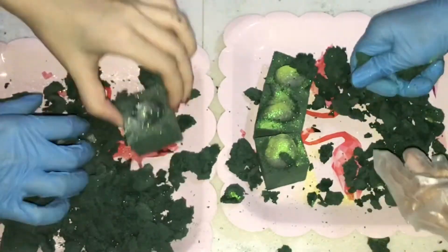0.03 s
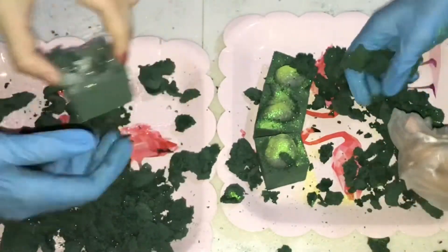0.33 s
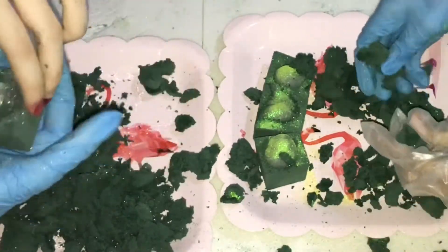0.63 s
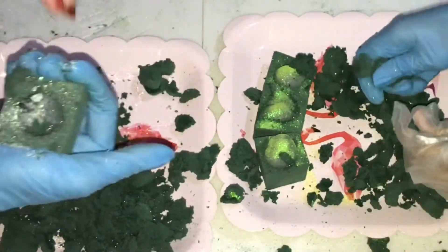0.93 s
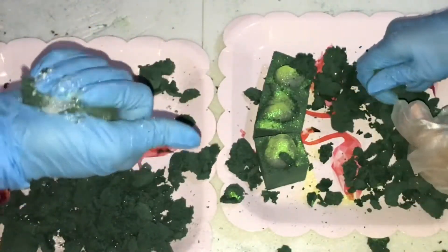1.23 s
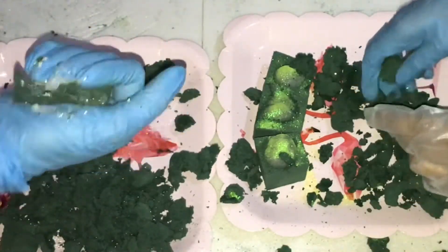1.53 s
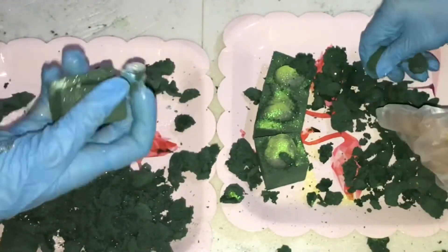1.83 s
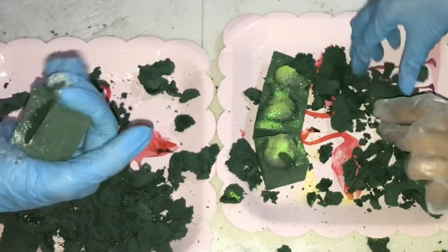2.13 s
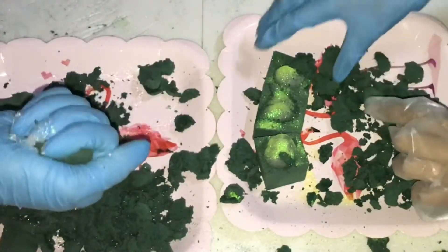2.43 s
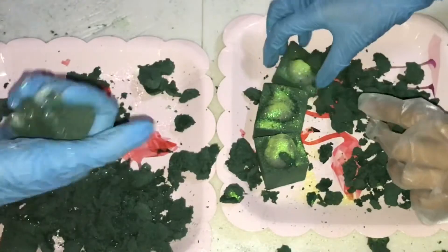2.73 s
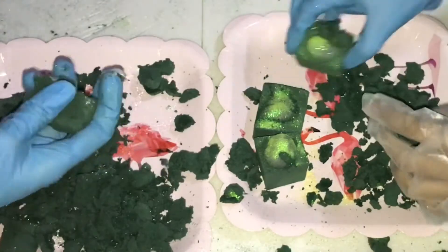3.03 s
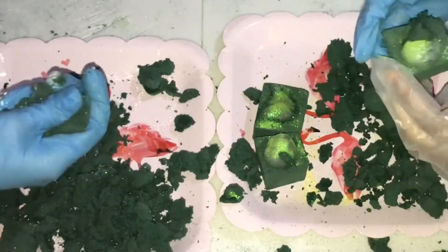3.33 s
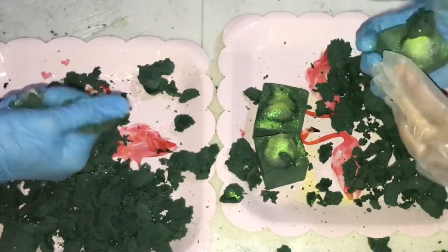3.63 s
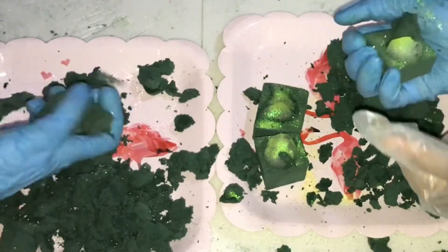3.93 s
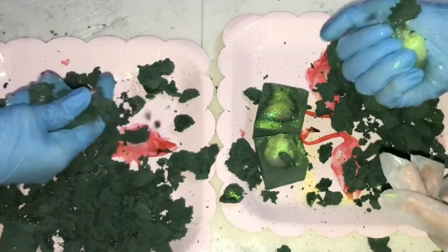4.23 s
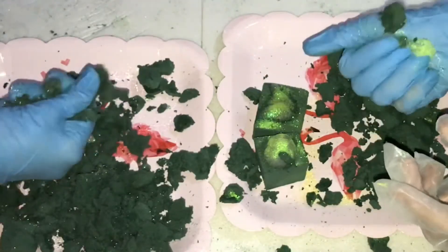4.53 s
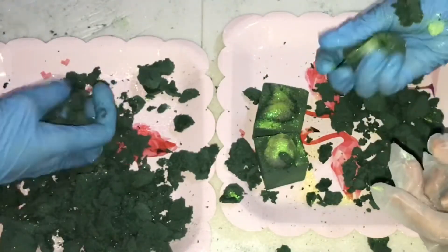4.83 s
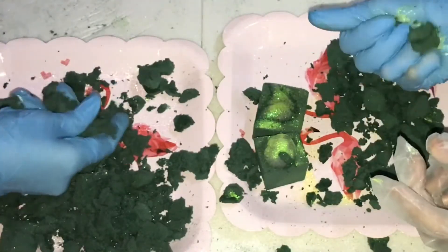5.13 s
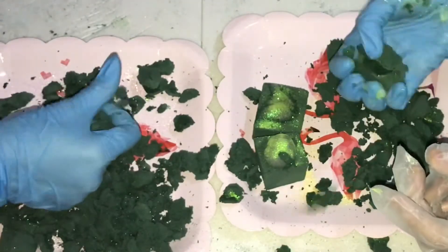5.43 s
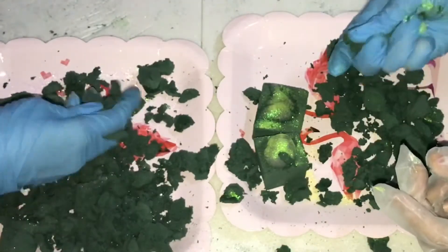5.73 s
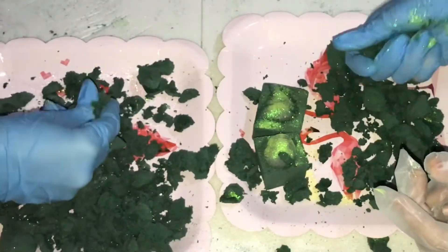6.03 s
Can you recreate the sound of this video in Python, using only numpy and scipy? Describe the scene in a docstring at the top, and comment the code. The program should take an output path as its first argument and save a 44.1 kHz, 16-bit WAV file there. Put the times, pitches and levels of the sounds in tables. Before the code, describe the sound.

Dry foam crunches and crackles in irregular squeezes, with occasional crisp snaps and faint glove rubbing in a quietly humming room.

```python
"""A dry, gritty crunching: gloved hands crush blocks of floral foam over plastic trays in a small room.
By brittle fracture, countless cell walls give way in a fine hiss and whole clusters in a coarser crunch
that rings the hollow of hand and tray; now and then a piece breaks with a sharp snap.
Gloves rub and lumps tap the tray, close to a mono microphone. The room rumbles and hums faintly."""
import sys
import numpy as np
from scipy import signal
from scipy.fft import rfft, irfft
from scipy.io import wavfile

SR = 44100
rng = np.random.default_rng(int(sys.argv[2]) if len(sys.argv) > 2 else 0)


def generate_wav(sig):
    """Save sig (samples, or channels by samples) to the path in sys.argv[1] as 16-bit PCM at SR."""
    pcm = np.round(np.clip(np.atleast_2d(sig).T, -1, 1) * 32767).astype(np.int16)
    wavfile.write(sys.argv[1], SR, pcm)


N = 277830
TIME = np.arange(N) / SR


def from_db(db):
    """Amplitude ratio of a level in decibels."""
    return 10 ** (np.asarray(db) / 20)


def unit_rms(x):
    """Normalisation to a mean power of 1."""
    return x / np.sqrt(np.mean(x ** 2) + 1e-20)


def drift(per_s):
    """Random modulation of rms 1: linear interpolation between per_s Gaussian values a second."""
    return unit_rms(np.interp(TIME * per_s, np.arange(N), rng.standard_normal(N)))


def band(x, low_hz, high_hz, order=2):
    """Causal Butterworth band-pass."""
    edges = [low_hz, min(high_hz, .45 * SR)]
    return signal.sosfilt(signal.butter(order, edges, "band", fs=SR, output="sos"), x + 1e-18)


def colour(x, spectrum, size=8192):
    """Minimum-phase filter through (f/Hz, gain/dB) points, so nothing sounds early."""
    hz, db = np.transpose(spectrum)
    grid_hz = np.maximum(np.arange(size // 2 + 1) * SR / size, 1)
    gain = from_db(np.interp(np.log(grid_hz), np.log(hz), db))
    cepstrum = irfft(np.log(gain))
    cepstrum[1:size // 2] *= 2
    cepstrum[size // 2 + 1:] = 0
    response = irfft(np.exp(rfft(cepstrum)))
    return signal.fftconvolve(x, response)[:N]


def resonance(x, hz, width_hz):
    """Damped two-pole resonator with gain 1 at its peak."""
    r = np.exp(-np.pi * width_hz / SR)
    gain = (1 - r * r) / 2
    feedback = [1, -2 * r * np.cos(2 * np.pi * hz / SR), r * r]
    return signal.lfilter([gain, 0, -gain], feedback, x + 1e-18)


def impulses(per_s, spread_db):
    """Shot noise of mean power near 1; impulse levels follow an exponential distribution."""
    chance = np.clip(per_s / SR, 1e-4, 1)
    sizes = from_db(spread_db * np.minimum(rng.exponential(1, N), 4.5)) * rng.choice([-1, 1], N)
    return (rng.random(N) < chance) * unit_rms(sizes) / np.sqrt(chance)


def fade(start, end, rise_s, fall_s):
    """Exponential growth and decay, given as time constants, around a plateau of 1."""
    exponent = np.maximum(start - TIME, 0) / rise_s + np.maximum(TIME - end, 0) / fall_s
    return np.exp(-np.minimum(exponent, 20))


def swell(t, length):
    """Gaussian envelope centred on t; length spans two standard deviations."""
    return np.exp(-2 * np.minimum(((TIME - t) / length) ** 2, 20))


# spectrum of breaking foam: f/Hz, gain/dB
FOAM_SPECTRUM = [(500, 4.5), (1150, -8), (1450, -4.5), (2900, -3.5), (3800, 3), (5000, 2), (6100, 3),
                 (7800, -1.5), (9300, -2), (10400, -2.5), (11700, -1.5), (13500, -4), (16000, -6.5)]

def fractures(per_s, spread_db):
    """Brittle fracture: each failing wall radiates one tick with the spectrum of the foam."""
    return colour(impulses(per_s, spread_db), FOAM_SPECTRUM)


# modes of the hollow: f/Hz, bandwidth/Hz, gain/dB
HOLLOW_MODES = [(875, 78, -8), (1535, 120, -2.5), (2180, 270, -2.5)]
# ringing as the fist closes and opens: t/s, gain/dB
CUPPING = [(0, -15.5), (1, 6), (2.2, -27), (3.7, -2.5), (4.0, 3), (5.2, 2), (6.3, -2.5)]

def hollow(x):
    """Cavity resonance of cupped hand and tray, stronger as the hand closes."""
    ringing_db = np.interp(TIME, *np.transpose(CUPPING))
    modes = sum(from_db(db) * resonance(x, hz, width) for hz, width, db in HOLLOW_MODES)
    return from_db(ringing_db) * modes


# crumbs in the gloves: t/s, level/dB
HANDLING = [(0, -52), (.3, -59), (.5, -54.5), (1.65, -56), (2.45, -56), (2.83, -63), (2.92, -55),
            (3.45, -56.5), (3.83, -56.5), (4.65, -53.5), (5.2, -54.5), (6.3, -53)]

def handling():
    """Granular noise: loose crumbs shift all the while. Yields envelope, crumbs/dB, dust/dB."""
    yield from_db(np.interp(TIME, *np.transpose(HANDLING))), -4, -2


# crunches: peak t/s, level/dB, rise/s, decay/s, relative crumb level/dB
CRUNCHES = [(.02, -49, 0.1, 0.032, -11), (0.116, -45, 0.029, 0.043, -3.5), (.235, -50.5, 0.06, 0.036, -3.5),
            (.395, -46.5, 0.056, 0.078, -1.5), (.765, -47, 0.017, 0.024, -8), (.86, -50, .02, .025, -17),
            (0.945, -35, 0.039, 0.079, -4.5), (0.988, -34.5, 0.015, .013, -8),
            (1.45, -48.5, .015, 0.034, -2), (1.61, -47.5, 0.01, 0.004, -4), (1.68, -49, 0.011, 0.021, -3),
            (1.796, -38, 0.032, .015, -3.5), (2.171, -34.5, 0.0031, 0.0079, -2),
            (2.66, -47.5, 0.0063, 0.004, 3), (2.859, -49, .004, 0.013, -3.5),
            (3.082, -39, 0.044, 0.012, -1.5), (3.135, -49.5, 0.035, .09, 4.5),
            (3.58, -52, 0.018, 0.019, -14), (4.078, -34, 0.024, .022, -3.5), (4.3, -46, 0.078, 0.023, -5),
            (4.955, -47, 0.013, .03, -5.5), (5.118, -46, 0.0071, 0.052, -3), (5.275, -48, 0.06, 0.013, -1),
            (5.442, -45, .012, 0.012, -8), (5.564, -40.5, 0.0093, .045, -0.5), (5.643, -42, 0.017, .02, -3),
            (5.67, -39, .012, 0.015, -3.5), (5.886, -44, .01, 0.014, -2), (6.0, -51, 0.023, 0.009, 3.5),
            (6.285, -49, 0.014, .03, -0.5)]

def crunches():
    """Local yielding: a patch gives way under a finger. Yields envelope, crumbs/dB, dust/dB."""
    for t, db, rise_s, fall_s, crumbs_db in CRUNCHES:
        dust_db = 0.16 * (db + 39)  # harder crunches grind more dust
        yield from_db(db) * fade(t, t, rise_s, fall_s), crumbs_db, dust_db


def crushing_levels():
    """Incoherent sources add in power: levels in dB of crumbs, cells and dust over all hand movements."""
    power = np.zeros((3, N))
    for envelope, crumbs_db, dust_db in [*handling(), *crunches(), *squeezes()]:
        power += np.outer(from_db([crumbs_db, 0, dust_db]), envelope) ** 2
    return 10 * np.log10(power)


def crushing():
    """Fracture at three scales: the smaller the piece, the higher and denser its ticks."""
    crumbs_db, cells_db, dust_db = crushing_levels()
    # harder squeezing breaks more walls a second
    pace = from_db(0.17 * (cells_db - np.mean(cells_db)))
    # the foam yields in small avalanches that all sizes share
    surge_db = .8 * drift(25) + .5 * drift(90) + .9 * drift(500)
    clusters = fractures(2400 * pace, spread_db=-1.0)
    crumbs = band(clusters, 1035, 3350, order=5) + hollow(clusters)
    cells = band(fractures(5000 * pace, spread_db=-0.5), 2500, 7580, order=3)
    dust = band(fractures(13000 * pace, spread_db=0.5), 7800, 17900, order=3)
    return (unit_rms(crumbs) * from_db(crumbs_db + surge_db + 1.5 * drift(45) - 1.0)
            + unit_rms(cells) * from_db(cells_db + surge_db + 0.81 * drift(45) - 0.78)
            + unit_rms(dust) * from_db(dust_db + surge_db + 0.15 * drift(45) + 2.47))


# spectrum of the room air: f/Hz, gain/dB
AIR_SPECTRUM = [(20, -18.5), (30, -12), (38, -8), (50, 2.5), (65, 1.5), (85, 1), (120, -4.5), (160, -13),
                (320, -14), (500, -18), (1000, -19), (3000, -45), (16000, -34)]
# hum lines: f/Hz, rms level/dB
HUM_LINES = [(39.7, -58), (120, -67), (181, -69), (500.5, -76)]

def background():
    """Ambient noise: a continuous rumble plus hum lines that waver in frequency and amplitude."""
    out = from_db(-53) * unit_rms(colour(rng.standard_normal(N), AIR_SPECTRUM))
    for hz, db in HUM_LINES:
        phase = 2 * np.pi * np.cumsum(hz + 1.286 * drift(6)) / SR
        out += np.sqrt(2) * from_db(db + 1.7 * drift(1.5)) * np.sin(phase)
    return out


# single fractures: t/s, peak level/dB, nominal f/Hz
SNAPS = [ (0.0856, -20.5, 8900), (.9257, -21, 5000), (0.9475, -11, 8000), (.9682, -15.5, 7500),
         (.9712, -6, 6900), (.9738, -18, 6600), (.9812, -16, 6000), (.9835, -4.6, 5200), (.9911, -13, 4300),
         (.9981, -15, 4100), (1.292, -27.5, 5550), (1.337, -27, 7000), (1.4121, -23, 6260),
         (2.0001, -20, 7500), (2.02, -30, 4200), (2.118, -24.5, 5000), (2.1393, -10, 11000),
         (2.1397, -15.5, 4700), (2.1688, -20, 6000), (2.1737, -19, 9400), (2.1905, -24, 7000),
         (2.2302, -23.5, 3300), (2.2418, -20, 5500), (2.8581, -30, 9100), (3.0658, -26, 3830),
         (3.081, -23, 6000), (3.576, -25.5, 3500), (3.7447, -23, 5260), (3.9639, -27.5, 4400),
         (4.0772, -14.5, 6500), (4.0828, -14, 6200), (4.0855, -15.5, 3900), (5.6427, -26.5, 3540)]

def snaps(size=1024):
    """Impulse response of a breaking piece: one heavily damped swing, then milliseconds of splinters."""
    out, age = np.zeros(N + size), np.arange(size) / SR
    splinters = .1 * from_db(-60 * age / .006)
    for t, peak_db, hz in SNAPS:
        force = splinters * rng.standard_normal(size)
        force[0] = 1
        snap = band(force, .29 * hz, 1.45 * hz, order=3)  # smaller pieces crack higher
        snap = band(snap, 1150, 18000, order=4)  # and radiate almost no bass
        start = round(t * SR) - np.argmax(np.abs(snap))
        out[start:start + size] += from_db(peak_db) * snap / np.max(np.abs(snap))
    return out[:N]


# glove strokes: centre t/s, duration/s, relative level/dB, f/Hz
RUBS = [(0.42, 0.088, -47, 2400), (0.762, 0.039, -38.5, 2410), (1.923, 0.034, -36, 2370),
        (2.355, 0.065, -40.5, 6100), (3.689, 0.027, -32, 7400), (3.72, 0.026, -31, 10200),
        (4.127, 0.032, -38, 1970), (4.955, .03, -44.5, 2160), (5.441, 0.033, -41.5, 2290)]

def rubs():
    """Stick-slip friction of rubber on foam: a swell of tiny slips through one broad resonance."""
    slips = impulses(2500, spread_db=-6.5)
    return sum(from_db(db - 9.5) * swell(t, length) * unit_rms(band(slips, 0.87 * hz, 1.24 * hz))
               for t, length, db, hz in RUBS)


# lumps landing on the tray: t/s, peak level/dB, f/Hz
TAPS = [(.485, -44, 850), (2.052, -38.5, 716), (3.657, -40.5, 910)]

def taps():
    """Impact excitation: each soft landing draws a short, dull knock from the plastic."""
    out = np.zeros(N)
    for t, peak_db, hz in TAPS:
        knock = band(signal.unit_impulse(N, round(t * SR)), .83 * hz, 1.27 * hz)
        out += from_db(peak_db) * knock / np.max(np.abs(knock))
    return out


# squeezes: start t/s, duration/s, level/dB, growth/(dB/s), decay/s, relative crumb and dust levels/dB
SQUEEZES = [(0.597, 0.25, -53, 14, 0.049, -27, 1), (1.06, 0.11, -43, -22, 0.06, -7, 3),
            (1.26, 0.36, -50.5, -28, .025, -5.5, -1), (1.873, 0.35, -50.5, 4, 0.044, -2.5, -2),
            (2.184, .14, -40.5, -28, 0.05, -4, 1.5), (2.51, 0.26, -53.5, -17.5, 0.018, -1, -2.5),
            (3.12, .39, -45, -17.5, 0.058, -5.5, 2), (3.55, 0.189, -46.5, -6, .009, -4, 0),
            (3.936, 0.22, -50, -3, 0.056, -1.5, -1), (4.232, 0.34, -52, -9, 0.033, -8, 1),
            (4.747, 0.28, -50, 2, 0.051, -8, -3), (5.506, 0.36, -50, -12.5, 0.013, -5.5, 2.5)]

def squeezes():
    """Progressive crushing under the steady load of a fist. Yields envelope, crumbs/dB, dust/dB."""
    for t, length, db, growth, fall_s, crumbs_db, dust_db in SQUEEZES:
        held = from_db(db + growth * np.clip(TIME - t, 0, length))
        yield held * fade(t, t + length, rise_s=0.027, fall_s=fall_s), crumbs_db, dust_db


# pockets of foam caving in: centre t/s, duration/s, level/dB
COLLAPSES = [(2.224, 0.006, -37), (3.083, 0.009, -35), (4.085, 0.0049, -30)]

def collapses():
    """Cascading failure: neighbouring walls break within milliseconds, ringing the hollow strongly."""
    walls = fractures(2200, spread_db=-0.5)
    grit = band(walls, 730, 3140, order=4) + from_db(7) * hollow(walls)
    return unit_rms(grit) * sum(from_db(db) * swell(t, length) for t, length, db in COLLAPSES)


def room(x, t60_s=0.11):
    """Reverberation: diffuse reflections from the table and near walls decay exponentially."""
    age = np.arange(SR // 2) / SR
    tail = rng.standard_normal(len(age)) * from_db(-60 * age / t60_s) * (age > .003)
    tail = band(tail, 200, 12000, order=1)
    return signal.fftconvolve(x, tail / np.sqrt(np.sum(tail ** 2)))[:N]


def scene():
    """Superposition of direct sound, reverberation and background, the same in both channels."""
    direct = crushing() + collapses() + snaps() + rubs() + taps()
    mono = direct + from_db(-18) * room(direct) + background()
    return np.stack([mono, mono])


# notches of the microphone's port: f/Hz, bandwidth/Hz, gain/dB
PORT_NOTCHES = [(4940, 150, -7), (7630, 180, -8.5), (10400, 510, -5.5)]

def record(dry, cutoff_hz=15720):
    """Antiresonance: the microphone's port absorbs narrow bands; a steep low-pass cuts the top."""
    heard = dry
    for hz, width, db in PORT_NOTCHES:
        heard = heard - (1 - from_db(db)) * resonance(heard, hz, width)
    return signal.sosfilt(signal.ellip(10, .1, 70, cutoff_hz, fs=SR, output="sos"), heard)


dry = scene()
out = record(dry)
generate_wav(out)
```